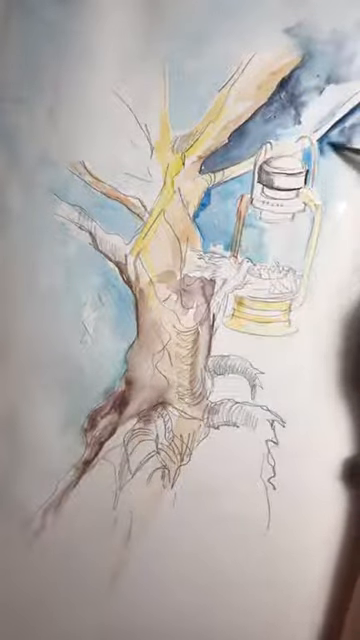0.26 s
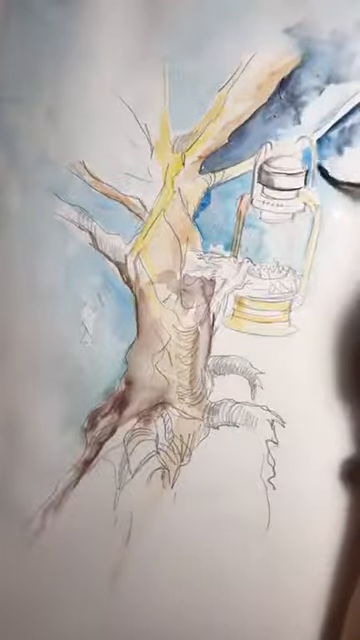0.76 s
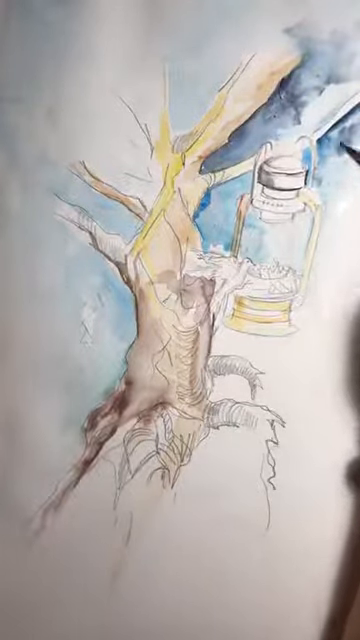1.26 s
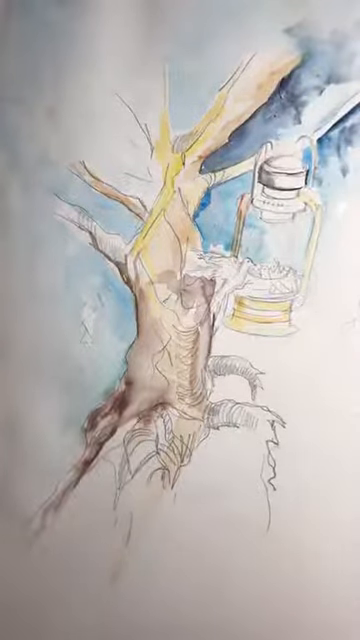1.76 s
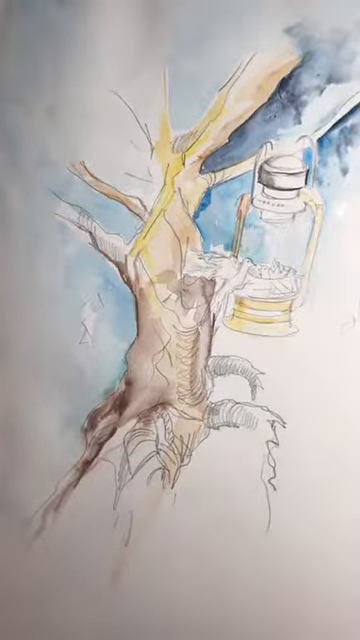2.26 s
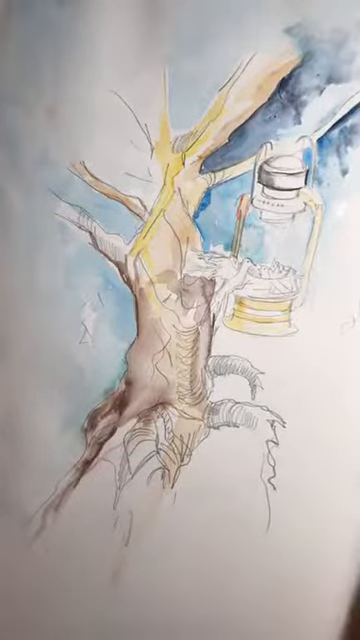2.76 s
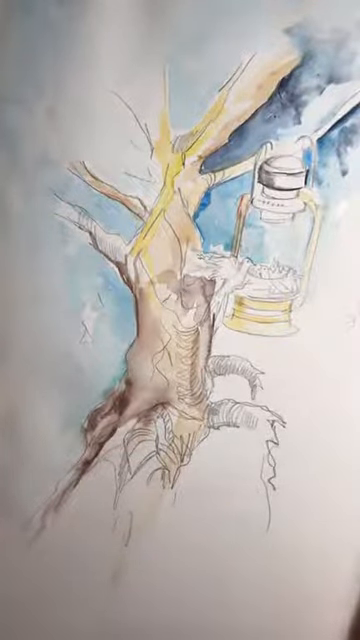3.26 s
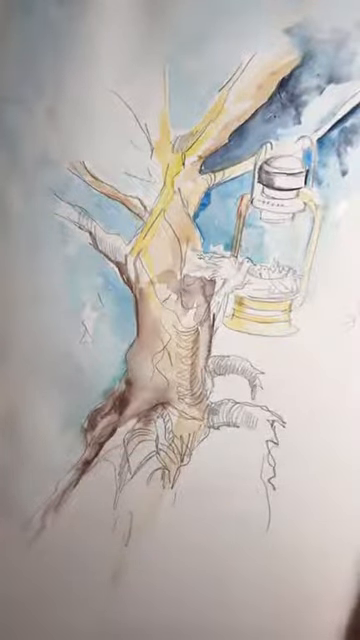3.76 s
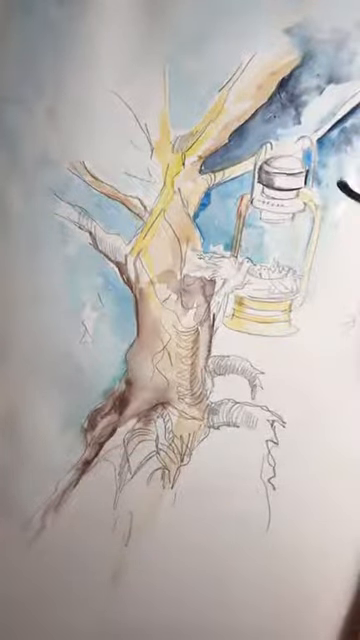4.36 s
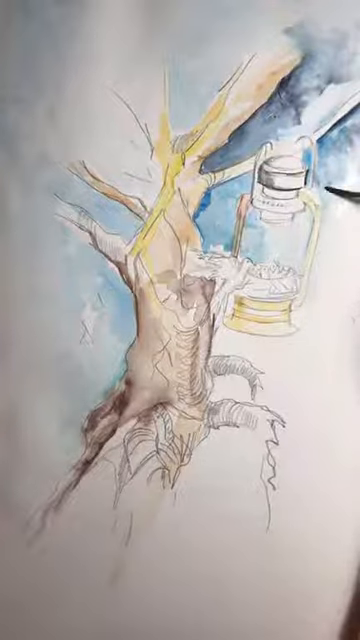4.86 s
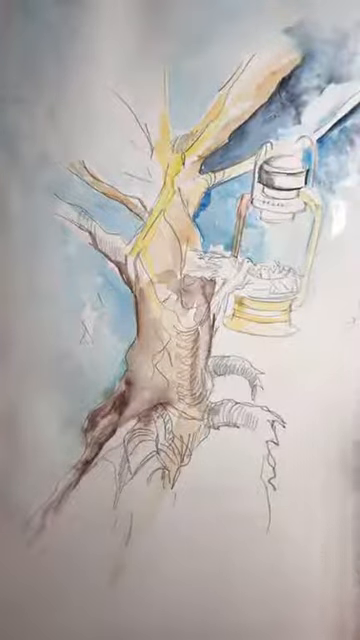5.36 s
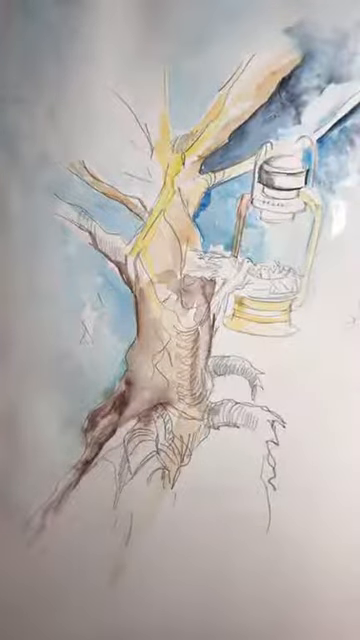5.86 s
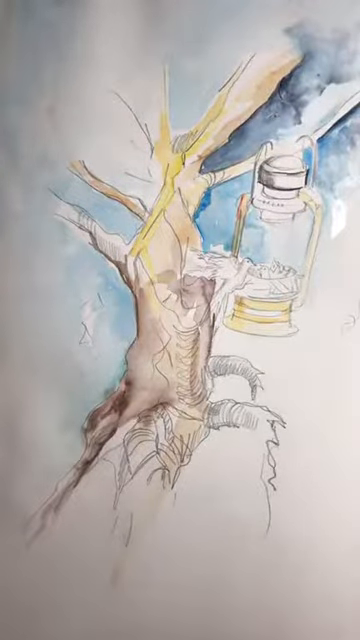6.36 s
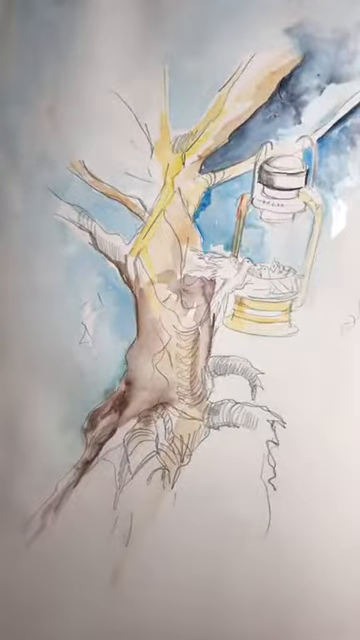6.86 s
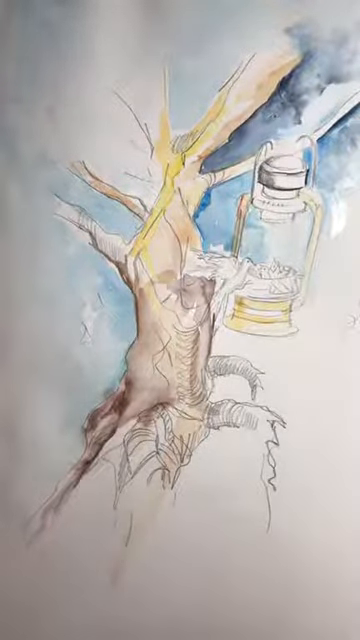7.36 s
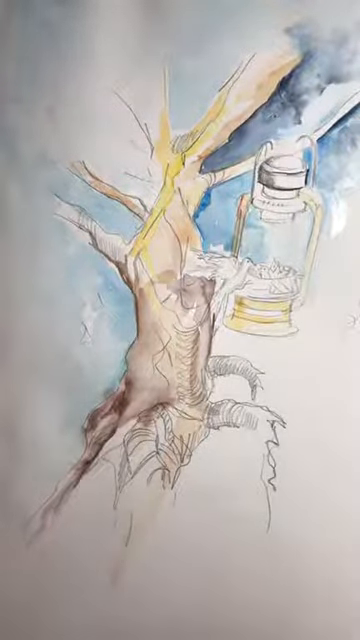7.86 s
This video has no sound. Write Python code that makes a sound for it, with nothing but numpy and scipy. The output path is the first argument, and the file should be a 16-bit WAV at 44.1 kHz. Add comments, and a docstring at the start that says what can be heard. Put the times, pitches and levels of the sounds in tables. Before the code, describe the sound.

A faint low hum fills a small quiet room throughout, and everything sounds close. From about 0.7 seconds a wet paintbrush makes a few very soft swishes, followed by a brief rub on paper near 1.5 seconds. Two light, dry ticks on a palette come at 2.0 and 2.4 seconds. From 2.6 to about 5 seconds the brush scrubs softly in short, grainy strokes, around four a second, ending with another faint paper rub. At 5.6 seconds its handle rattles sharply against a glass water jar, which rings briefly. Lighter clinks follow at 6.1 and 6.3 seconds, then the loudest, brightest clink at 6.4. At 6.8 seconds the brush is laid down with a sharp tap and a slight table thud. A small tick comes near 7.3 seconds, then a hand rustles softly over paper and shuffles things on the table until about 8 seconds.

```python
"""A faint hum in a small quiet room, then the soft swishes of a watercolour brush and ticks on a palette.
Its handle clinks and rattles against a glass water jar: each touch cracks and rings the glass modes.
The brush is laid down with a tap; a hand rustles over paper and shuffles things on the table.
Bristles and skin make grainy friction noise; hits also thud through the table top."""
import sys
import numpy as np
from scipy import signal
from scipy.fft import rfft, irfft, next_fast_len
from scipy.io import wavfile

SR = 44100
rng = np.random.default_rng(int(sys.argv[2]) if len(sys.argv) > 2 else 0)


def unload_audio(sound):
    """Save the sound as a 16-bit wav file, at the path given as the first command line argument."""
    columns = np.transpose(np.atleast_2d(sound))
    # keep every value between -1 and 1, then stretch to whole-number steps
    steps = np.round(np.clip(columns, -1, 1) * 32767)
    wavfile.write(sys.argv[1], SR, steps.astype(np.int16))


N = 357651
BLOW_SAMPLES = SR // 2
TIME_S = np.arange(N) / SR
AGE_S = TIME_S[:BLOW_SAMPLES]   # time since a blow

# Noise spectra. Each row: frequency in Hz, relative density in dB.
AIR_SPECTRUM = [(12, -37), (20, -13), (55, 1.5), (72, -6), (91, -14), (215, -21), (262, -23), (320, -19.5),
                (434, -29), (574, -26), (718, -29.5), (780, -30), (897, -30), (2600, -34.5), (16000, -45)]
PAPER_SPECTRUM = [(200, 1), (700, 3), (1200, 2), (2000, 3), (3500, 0.5), (6000, 1.5), (9000, 5.5),
                  (11000, -1), (14000, 5.5), (16000, -6)]
SLIDE_SPECTRUM = [(50, -12), (90, -4), (170, 3), (250, -3), (400, -7.5), (600, -13.5), (850, -21),
                  (1350, -13.5), (1700, -28), (3000, -34.5)]
BRISTLE_SPECTRUM = [(500, -17), (1200, -4.5), (1500, -18), (1950, 3), (3200, -1.5), (5000, -5), (7000, -9),
                    (13000, -17), (16000, -21)]
THUD_SPECTRUM = [(50, -22), (90, 2), (125, 10), (180, -8.5), (290, 1), (420, -11.5), (800, -13.5),
                 (1500, -29.5), (3000, -69)]
TAP_SPECTRUM = [(300, -13), (650, -36), (950, 3), (1400, -9.5), (2000, -4.5), (4000, -3.5), (8000, 3),
                (12000, -1.5), (16000, -1.5)]
CRACK_SPECTRUM = [(200, -12.5), (900, -6), (1700, -11.5), (2500, 3.5), (3000, -4), (3900, 0), (4800, 4),
                  (5600, 1.5), (6400, 4), (7400, -2.5), (9700, 4.5), (11300, -3), (14000, 1.5),
                  (16000, -3.5)]
# Room decay. Each row: frequency in Hz, T60 in seconds.
ROOM_DECAY = [(100, 0.28), (1000, 0.33), (5000, 0.32), (10000, 0.36), (16000, 0.26)]
# Hum resonances. Each row: frequency in Hz, width in Hz, level in dB.
HUM_BANDS = [(53.5, 11, -60.5), (118.7, 6, -75), (240, 11.5, -77.5), (289.8, 7.4, -70.5), (584.3, 5.4, -79),
             (2147, 210, -77), (2576, 260, -78), (6080, 350, -81.5), (6710, 420, -81.5)]
# Whine tones. Each row: frequency in Hz, width in Hz, relative level in dB.
WHINE_BANDS = [(786, 4, -1), (605, 57, -1.5)]
# Whine envelope. Each row: time in seconds, level in dB.
WHINE_LEVELS = [(0.0, -72.5), (0.96, -74), (1.56, -91), (4.17, -88), (4.75, -74.5), (5.5, -76.5)]
# Brief rubs on paper. Each row: peak time in seconds, level in dB, swell and fade in seconds.
PAPER_RUBS = [(1.38, -65, .08, 0.21), (1.485, -53.5, 0.062, 0.025), (2.365, -67, .025, .07),
              (2.81, -61, .14, 0.13), (3.1, -65.5, 0.28, .08), (5.15, -62, 0.069, 0.13),
              (5.24, -61.5, 0.093, 0.038)]
# Two hand moves: a sweep over paper, then shifting things.
# Each row: time in seconds, relative rustle in dB, rumble in dB.
HAND_MOVES = [
    [(7.38, -73, -84), (7.422, -71, -77), (7.43, -63, -65), (7.506, -56, -78), (7.646, -57, -66),
     (7.66, -54.5, -57), (7.698, -71, -70), (7.728, -68, -77), (7.8, -74, -75)],
    [(7.8, -72, -70), (7.822, -71, -54), (7.842, -71, -80), (7.898, -67, -65), (7.93, -54, -49.5),
     (7.996, -65.5, -48), (8.052, -60.5, -59), (8.068, -57, -45.5), (8.11, -62, -53)],
]
# Wet strokes. Each row: start in seconds, level in dB, resonance in Hz.
BRUSH_STROKES = [(.71, -67.5, 2100), (.932, -65.5, 2000), (1.254, -64, 2100), (2.625, -56.5, 4300),
                 (2.854, -62, 2140), (3.016, -60.5, 3060), (3.237, -59.5, 3900), (3.471, -59.5, 2900),
                 (3.717, -55.5, 2070), (3.987, -60.5, 2000), (4.25, -62.5, 1990), (4.45, -66, 2100),
                 (4.61, -65, 2050), (5.015, -59, 2050), (5.04, -55, 4370)]
# Taps on palette and table. Each row: start in seconds, level in dB, resonance in Hz,
# treble tilt in dB per octave, thud in dB.
DRY_TAPS = [(2.0273, -42.5, 7300, 7.5, -81), (2.4462, -35.5, 7440, -3.5, -81), (6.7883, -26, 6400, 5, -46),
            (6.7905, -22.5, 6700, 5, -42.5), (6.7991, -34.5, 9800, 2.5, -49),
            (7.2503, -41.5, 2400, -4, -74.5), (7.2972, -52, 1700, -10, -69)]
# Jar's lowest bending mode, split by its uneven wall, and a weak neighbour.
# Each row: frequency in Hz, relative level in dB, T60 in seconds.
RIM_MODES = [(2574, -7, 0.32), (2588, 0.5, 0.24), (2612, -4, 0.12), (2694, -10, 0.13)]
# Higher jar modes, damped by the water. Each row: frequency in Hz, relative level in dB, T60 in seconds.
GLASS_MODES = [(3410, -7, 0.035), (3910, -7, 0.024), (4750, -1, 0.05), (5202, -18, 0.16), (6150, -11, .045),
               (6380, -9, .035), (6439, -9, 0.05), (6800, -28, .18), (7100, -27, .18), (8690, -7, .03),
               (9740, -13, 0.04), (10000, -11, .04), (10172, -12, 0.12), (10400, -18.5, .11),
               (12200, -20, .1), (12785, -22, 0.14), (13600, -17, .13), (13700, -22.5, .12),
               (14018, -21, .15), (14642, 2, 0.038), (14851, -16, .06)]
# Handle hits on the jar; at 5.655 s the rim note swells again after the rattle.
# Each row: start in seconds, crack in dB, hardness in dB per kHz (before the cap),
# glass ring in dB, rim note in dB, loss per rebound in dB.
JAR_EVENTS = [(5.5828, -17.5, -0.77, -27, -34.5, 6), (5.6071, -19, 3, -29, -41, 1.5),
              (5.6339, -22, 1.3, -25.5, -48, 12), (5.6443, -36.5, 1.5, -38, -36.5, 16),
              (5.655, -45, .2, -49, -39, 14), (6.0729, -33.5, -2.1, -40.5, -38.5, 12),
              (6.0967, -46, -2.5, -55, -48, 14), (6.118, -42.5, -1, -48, -54, 10),
              (6.263, -27, -1.8, -30.5, -29.5, 7.5), (6.2737, -30.5, -0.8, -40.5, -35, 4),
              (6.2836, -28.5, 0, -29, -40, 6.5), (6.4377, -12.5, .6, -12.5, -27, 12)]


def from_db(db):
    """Decibels to gain."""
    return 10 ** (np.asarray(db) / 20)


def unit_rms(x):
    """Scale to unit power."""
    return x / np.sqrt(np.mean(x ** 2) + 1e-20)


def at_hz(points, hz):
    """Read a table on a log-frequency axis."""
    points_hz, values = np.transpose(points)
    return np.interp(np.log(hz + 1), np.log(points_hz), values)


def shaped(gain_at, size):
    """Unit noise with a spectrum given as a function of Hz."""
    padded = next_fast_len(size, True)
    hz = np.fft.rfftfreq(padded, 1 / SR)
    phases = np.exp(2j * np.pi * rng.random(len(hz)))
    return unit_rms(irfft(gain_at(hz) * phases, padded)[:size])


def noise(spectrum, size, tilt_db_oct=0):
    """Coloured noise, tilted above 2 kHz."""
    return shaped(
        lambda hz: from_db(at_hz(spectrum, hz) + tilt_db_oct * np.log2(np.maximum(hz, 2000))), size)


def band(hz, width_hz, size):
    """Noise around one frequency."""
    return shaped(lambda f: 1 / (1 + ((f - hz) / width_hz) ** 2) ** 2, size)


def tones(bands):
    """Wavering tones from narrow noise bands."""
    return sum(from_db(db) * band(hz, width_hz, N) for hz, width_hz, db in bands)


def swell(rise_s):
    """Build-up of a vibration."""
    return 1 - np.exp(-AGE_S / rise_s)


def fade(t60_s):
    """Free decay after a blow."""
    return np.exp(-np.log(1000) * AGE_S / t60_s)


def envelope(rows):
    """Gain from rows of seconds and dB; silent outside them."""
    times_s, db = np.transpose(rows)
    return from_db(np.interp(TIME_S, times_s, db)) * (TIME_S >= times_s[0]) * (TIME_S < times_s[-1])


def background(air_db=-56.5, thin_db=-80.5):
    """Room air, a wavering hum, a whine that comes and goes, a thin high tone."""
    whine = from_db(np.interp(TIME_S, *np.transpose(WHINE_LEVELS))) * tones(WHINE_BANDS)
    air = from_db(air_db) * noise(AIR_SPECTRUM, N)
    hum = tones(HUM_BANDS)
    thin_tone = from_db(thin_db) * band(hz=2670, width_hz=7.5, size=N)
    return air + hum + whine + thin_tone


def room(sent, build_s=0.0057):
    """Diffuse reflections build quickly; each band decays at its own rate."""
    hz = np.fft.rfftfreq(BLOW_SAMPLES, 1 / SR)
    white = rfft(shaped(np.ones_like, BLOW_SAMPLES))
    centres_hz, t60s_s = np.transpose(ROOM_DECAY)
    tail = np.zeros(BLOW_SAMPLES)
    for weights, t60_s in zip(np.eye(len(centres_hz)), t60s_s):
        band_gain = at_hz(list(zip(centres_hz, weights)), hz)
        tail += irfft(white * band_gain, BLOW_SAMPLES) * fade(t60_s)
    tail *= 1 - np.exp(-(AGE_S / build_s) ** 2)
    return signal.fftconvolve(sent, tail / np.linalg.norm(tail))[:N]


def add(track, start_s, sound):
    """Mix a sound into a track."""
    start = int(round(start_s * SR))
    track[start:start + len(sound)] += sound[:N - start]


def friction(hiss, grain_db, grain_hz):
    """Fibres catch and let go, breaking hiss into grains."""
    return unit_rms(hiss * from_db(grain_db * band(0, grain_hz, len(hiss))))


def rub_gain(peak_s, db, swell_s, fade_s, range_db=19.5):
    """A rub climbs range_db over its swell and drops as far over its fade."""
    distance = np.maximum((peak_s - TIME_S) / swell_s, (TIME_S - peak_s) / fade_s)
    return from_db(db - range_db * np.minimum(distance, 10))


def hand(rustle_db=1.5):
    """Skin rustles on paper and drags at the end of the sweep; things slide and rumble on the table."""
    sweep = sum(envelope([(s, db + rustle_db) for s, db, _ in move]) for move in HAND_MOVES)
    push = sum(envelope([(s, db) for s, _, db in move]) for move in HAND_MOVES)
    rubs = sum(rub_gain(*rub) for rub in PAPER_RUBS)
    rustle = (sweep + rubs) * friction(noise(PAPER_SPECTRUM, N), grain_db=1.5, grain_hz=500)
    drag = rub_gain(peak_s=7.65, db=-55, swell_s=0.04, fade_s=0.07) * band(1820, width_hz=1000, size=N)
    rumble = push * friction(noise(SLIDE_SPECTRUM, N), grain_db=0.5, grain_hz=120)
    return rustle + drag + rumble


def brush(scrub_s=0.044, release_s=0.012, plain_db=-57, wet_hz=2070, body_db=-5, width_hz=550):
    """Wet bristles bite, scrub and lift off. Firmer or higher-pitched strokes are brighter."""
    out = np.zeros(N)
    pressure = swell(rise_s=0.008) * np.exp(-np.maximum(AGE_S - scrub_s, 0) / release_s)
    for start_s, db, hz in BRUSH_STROKES:
        tilt_db_oct = 0.2 * (db - plain_db) + 4.1 * np.log2(hz / wet_hz)
        hiss = noise(BRISTLE_SPECTRUM, BLOW_SAMPLES, tilt_db_oct)
        hiss += from_db(body_db) * band(hz, width_hz, BLOW_SAMPLES)
        add(out, start_s, from_db(db) * pressure * friction(hiss, grain_db=2.4, grain_hz=400))
    return out


def table_thud(t60_s, rise_s):
    """The table top answers a blow with a dull boom."""
    return noise(THUD_SPECTRUM, BLOW_SAMPLES) * fade(t60_s) * swell(rise_s)


def taps(body_db=-7, width_hz=1200):
    """Dry knocks on palette and table, each with one broad resonance and a thud."""
    out = np.zeros(N)
    for start_s, db, hz, tilt_db_oct, thud_db in DRY_TAPS:
        knock = noise(TAP_SPECTRUM, BLOW_SAMPLES, tilt_db_oct)
        knock += from_db(body_db) * band(hz, width_hz, BLOW_SAMPLES)
        thud = from_db(thud_db) * table_thud(t60_s=0.22, rise_s=0.00058)
        add(out, start_s, from_db(db) * knock * fade(t60_s=0.027) + thud)
    return out


def ring(modes, tilt_db_khz, scatter_db):
    """Decaying modes share a blow's energy; each blow lands elsewhere and weights them anew."""
    modes_hz, db, t60s_s = np.transpose(modes)
    shares = from_db(db + tilt_db_khz * modes_hz / 1000 + scatter_db * rng.uniform(-1, 1, len(modes)))
    out = np.zeros(BLOW_SAMPLES)
    for gain, hz, t60_s in zip(shares / np.linalg.norm(shares), modes_hz, t60s_s):
        mode = gain * fade(t60_s) * np.sin(2 * np.pi * hz * AGE_S)
        size = int(t60_s * SR)
        out[:size] += mode[:size]
    return out


def rim_note():
    """The jar's split mode blooms into a clear, beating note."""
    return ring(RIM_MODES, tilt_db_khz=0, scatter_db=3.3) * swell(rise_s=0.00205)


def chatter(start_s, loss_db, touches=3, gap_s=0.0045, spread=0.15):
    """The handle rebounds unevenly, weaker each time. Returns seconds and dB per touch."""
    gaps_s = gap_s * (1 + spread * rng.uniform(-1, 1, touches))
    return [(start_s + gaps_s[:k].sum(), -k * loss_db) for k in range(touches)]


def jar(contact_s=0.0005, cap_db_khz=0.7):
    """Each touch cracks and rings the glass; each hit sounds the rim and shakes the table."""
    cracks, rings, rim = np.zeros((3, N))
    for start_s, crack_db, hardness_db_khz, ring_db, rim_db, loss_db in JAR_EVENTS:
        tilt_db_khz = min(hardness_db_khz, cap_db_khz)   # soft hits lose treble
        spectrum = [(hz, db + tilt_db_khz * hz / 1000) for hz, db in CRACK_SPECTRUM]
        for touch_s, touch_db in chatter(start_s, loss_db):
            crack = noise(spectrum, BLOW_SAMPLES) * fade(t60_s=0.023)
            glass = ring(GLASS_MODES, tilt_db_khz, scatter_db=1.5)
            add(cracks, touch_s, from_db(crack_db + touch_db) * crack * swell(contact_s))
            add(rings, touch_s, from_db(ring_db + touch_db) * glass * swell(contact_s))
        thud_db = -38 + 0.72 * crack_db + 0.77 * (crack_db - ring_db)   # less ring, more shove
        add(cracks, start_s, from_db(thud_db) * table_thud(t60_s=0.28, rise_s=0.00074))
        add(rim, start_s, from_db(rim_db) * rim_note())
    ping = np.sin(2 * np.pi * 3360 * AGE_S) * fade(t60_s=0.1)
    add(rim, 6.0485, from_db(-51) * ping)   # brush comes up to the rim
    add(rim, 6.7915, from_db(-51) * rim_note())   # laying the brush down jolts the jar
    return cracks, rings, rim


def scene():
    """Close mono mix; each source on the table sends its own share into the room."""
    cracks, rings, rim = jar()
    knocks = taps()
    rubbing = brush() + hand()
    direct = cracks + rings + rim + knocks + rubbing
    sends_db = [(cracks, -6), (rings, -14), (rim, -17), (knocks, -10), (rubbing, -8)]
    sent = sum(from_db(db) * source for source, db in sends_db)
    return (direct + room(sent) + background())[None]


def record(dry):
    """Steep low-pass."""
    cutoff_hz = 15700
    return signal.sosfilt(signal.ellip(12, 0.1, 70, cutoff_hz, fs=SR, output="sos"), dry)


dry = scene()
out = record(dry)
unload_audio(out)
```